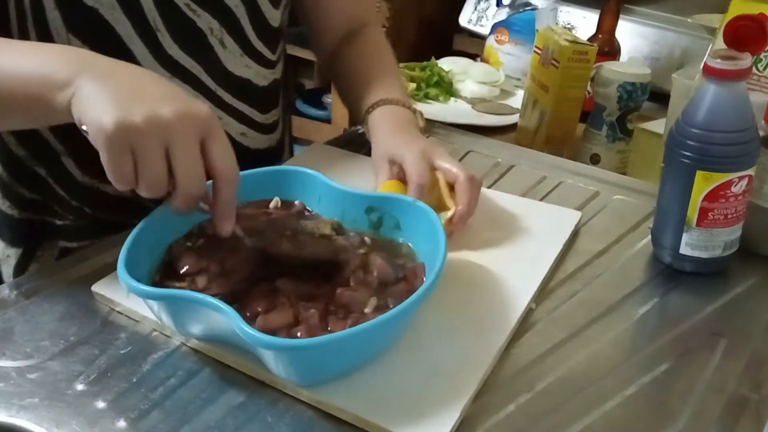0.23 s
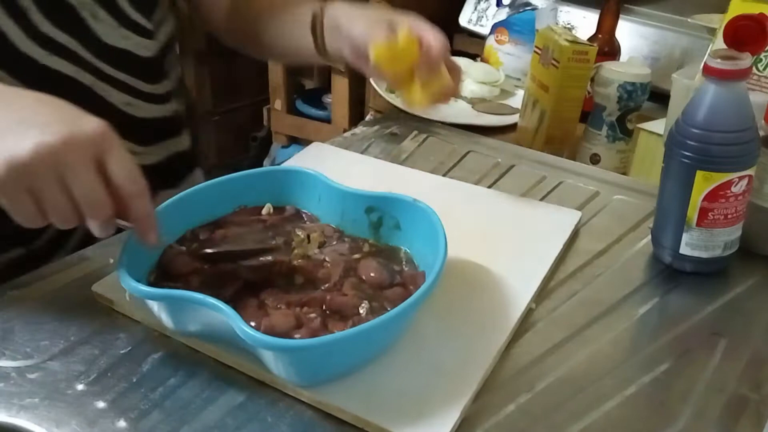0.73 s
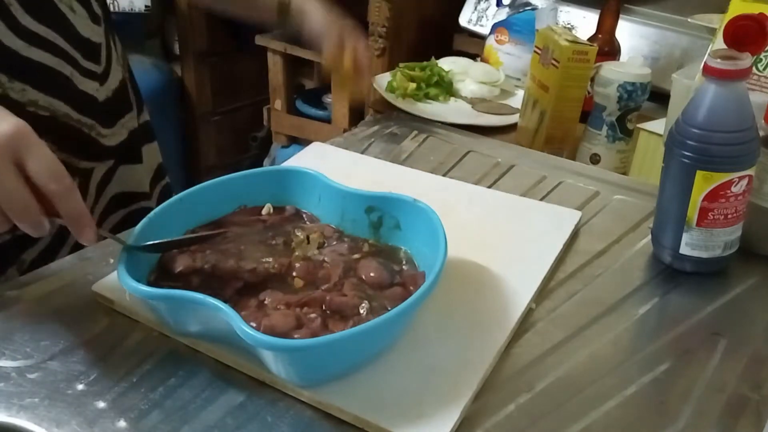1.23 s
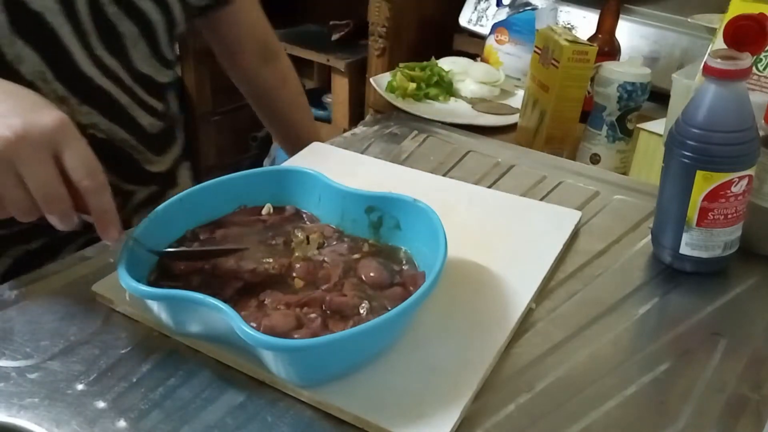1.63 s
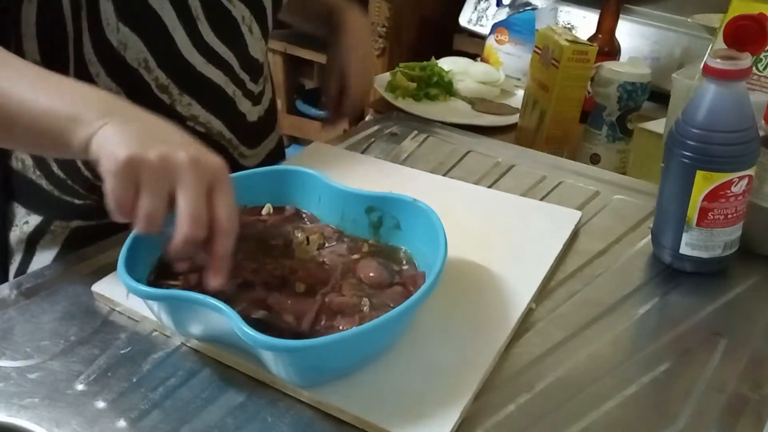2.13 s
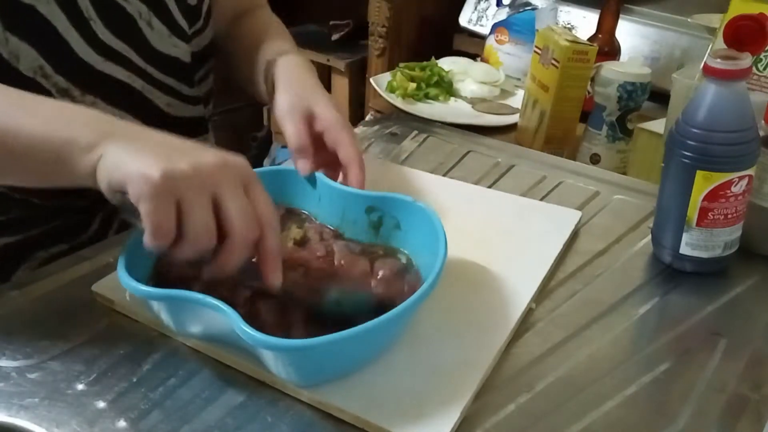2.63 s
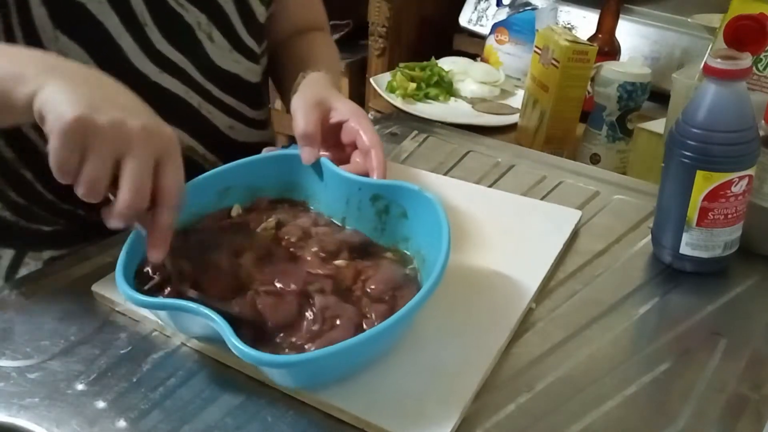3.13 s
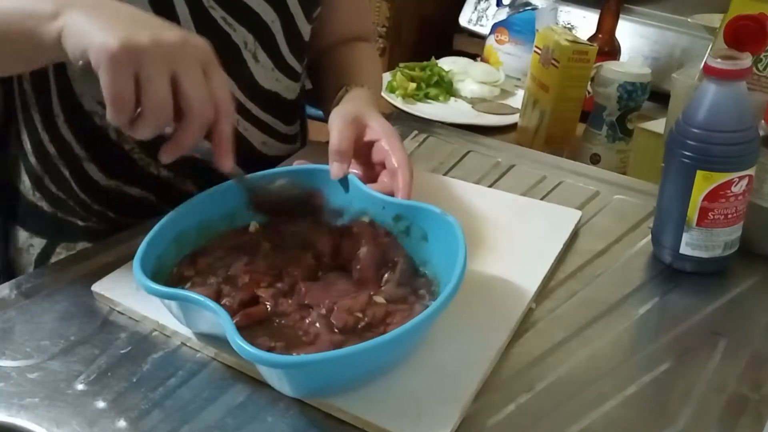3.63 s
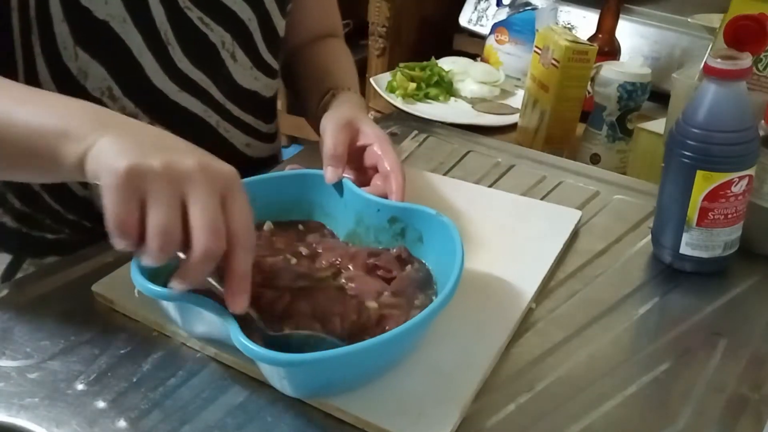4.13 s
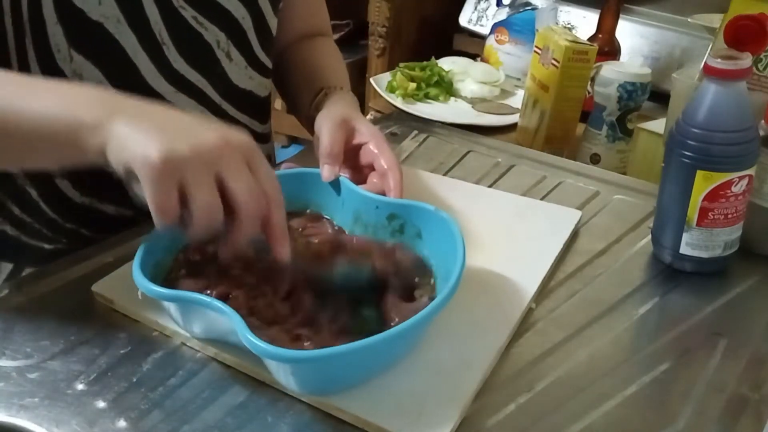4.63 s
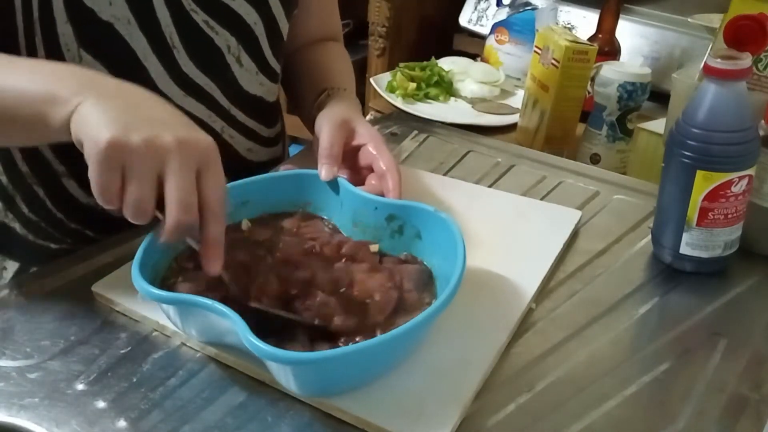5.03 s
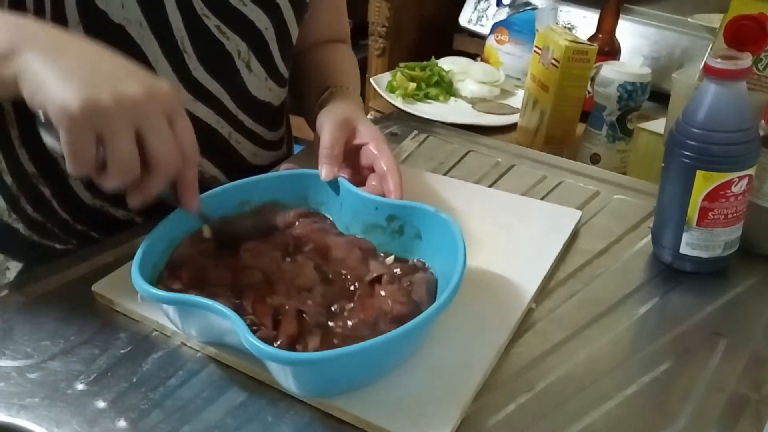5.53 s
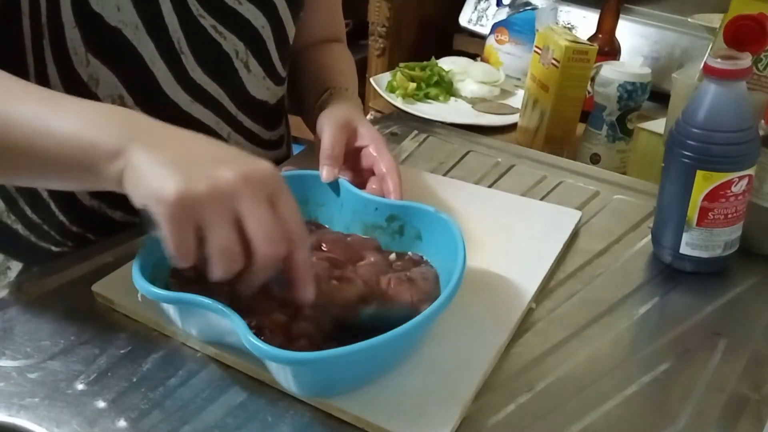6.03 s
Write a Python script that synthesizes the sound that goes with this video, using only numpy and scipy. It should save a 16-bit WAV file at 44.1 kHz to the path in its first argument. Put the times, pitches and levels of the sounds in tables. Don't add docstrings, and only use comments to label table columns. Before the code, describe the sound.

Close, slightly muffled phone pickup in a small kitchen with faint low hum. Low rumble and wet squelching come with sharp plastic knocks; after a lull, a spoon scrapes the bowl wall and rattles. Quiet sucking, sloshing and small ticks continue, broken by firm knocks past the middle and one hard, rattling clatter near the end, then only soft stirring.

```python
import sys
import numpy as np
from scipy import signal
from scipy.fft import rfft, irfft, next_fast_len
from scipy.io import wavfile
from scipy.ndimage import uniform_filter1d

SR = 44100
rng = np.random.default_rng(int(sys.argv[2]) if len(sys.argv) > 2 else 0)


def master(y):
    cut = np.clip(np.atleast_2d(y).T, -1, 1)
    pcm = np.round(cut * 32767)
    wavfile.write(sys.argv[1], SR, pcm.astype(np.int16))


def makeup_ratio(level_db):
    decades = np.asarray(level_db, float) / 20
    return 10 ** decades


N = 277256

# pitch_hz, level_db
AIR_TONE = [(24, -18), (40, -19), (86, -7.5), (150, -6), (263, -20.5), (381, -16), (620, -25),
            (1000, -30.5), (2500, -35), (5500, -41), (7000, -54), (9000, -78.5), (16000, -120)]
RUMBLE_TONE = [(15, -24.5), (25, -21.5), (38, -24.5), (86, -9), (113, 1), (135, -0.5), (151, -22),
               (172, -5.5), (280, -25.5), (360, -60.5), (620, -120)]
SLOSH_TONE = [(150, -41.5), (250, 1), (270, -5.5), (572, -5.5), (617, 2), (704, -15.5), (791, -6.5),
              (1300, -23), (1690, -39), (2860, -120)]
SQUELCH_TONE = [(530, -36), (900, -6.5), (1400, 0.5), (2110, -1), (2950, -7.5), (4000, -20.5), (6000, -45)]
FIZZ_TONE = [(1800, -39), (2800, -2.5), (3500, -1.5), (5900, -5), (7000, -11.5), (7800, -20), (10000, -14),
             (13000, -44)]
SCRAPE_TONE = [(150, -58), (250, -17), (362, -2.5), (547, -7), (780, -1), (1250, 0), (4420, -6),
               (6140, -10), (7490, -17.5), (8300, -20.5), (9700, -17.5), (12000, -32), (13300, -40),
               (14800, -39), (15500, -40.5)]
MIC_TONE = [(30, -5), (70, 3), (6200, -1.5), (7300, -4), (8100, -10.5), (9700, -12), (12000, -12.5),
            (15000, -11.5)]
# pitch_hz, width_hz, level_db
BOOM = [(92.2, 50, -7), (135, 34, -3), (182.1, 18.8, 4.5), (285, 56, -18)]
HOLLOW = [(374, 59, 1), (495.4, 54.6, 4), (571, 47, 0), (662.5, 96, -1.5), (777.6, 37, 1), (857, 28, -2.5)]
RING = [(1180, 315, 0), (1400, 130, 3), (1690, 820, -1.5), (2000, 230, 1), (2270, 680, -6),
        (2628, 120, -3.5), (2830, 340, -7)]
SPLASH = [(3440, 910, 6.5), (4300, 1700, 2), (5630, 1800, 0), (6450, 2700, -6.5), (9600, 3100, -17.5),
          (13000, 3000, -36)]
# peak_s, rise_and_fall_s, rumble_db, slosh_below_rumble_db
SHOVES = [(.06, 0.19, -59, -16), (.31, 0.22, -63, -6.5), (0.471, 0.1, -56, -14), (0.659, .11, -56, -19),
          (0.861, 0.034, -61.5, -24), (0.939, 0.076, -59.5, -4.5), (1.036, 0.043, -60.5, -14),
          (1.155, 0.12, -59, -16.5), (1.331, 0.072, -63, -20), (1.424, 0.1, -62, -27),
          (1.652, 0.098, -56.5, -23), (1.95, 0.24, -56.5, -7), (2.419, .06, -61, -25),
          (2.56, 0.09, -61, -12.5), (2.638, 0.27, -59.5, -11.5), (2.89, 0.045, -60, -9.5),
          (2.98, 0.046, -62.5, -11), (3.13, 0.51, -60.5, -14.5), (3.5, 0.26, -61, -19),
          (3.75, 0.18, -62.5, -12), (3.919, 0.14, -59, -7.5), (4.25, 0.18, -56, -15.5),
          (4.485, 0.13, -54.5, -18.5), (4.86, 0.13, -57, -15.5), (5.1, 0.089, -70.5, -8.5),
          (5.37, 0.11, -59, -9), (5.649, 0.17, -56, -20.5), (5.92, 0.21, -62, -9), (6.093, 0.15, -54, -20),
          (6.269, 0.083, -64.5, -9)]
# peak_s, rise_s, fall_s, squelch_db, fizz_over_squelch_db
STROKES = [(0.071, 0.064, 0.19, -60, -3), (.472, 0.099, 0.064, -72.5, 1.5),
           (.658, 0.047, 0.11, -72.5, -7.5), (.942, 0.12, 0.1, -73.5, -2.5), (1.038, 0.11, 0.043, -75, -9),
           (1.155, 0.41, 0.26, -78, -10), (1.6, 0.05, 0.49, -78.5, -5.5), (1.85, 0.22, .3, -76.5, 6.5),
           (2.42, .3, 0.074, -64, -11), (2.578, 0.22, 0.14, -74, -5), (2.78, 0.4, 0.59, -75.5, -5.5),
           (2.916, 0.014, 0.015, -71.5, -9), (2.97, 0.013, 0.55, -85.5, -17), (3.328, 0.22, 0.33, -89, -1),
           (3.578, 0.13, 0.028, -73, -5.5), (3.63, 0.0078, 0.42, -73, -1.5),
           (3.726, 0.095, 0.027, -82, 11.5), (3.95, 0.24, 0.055, -70.5, -5.5),
           (4.257, 0.043, 0.14, -68.5, -4), (5.239, 0.1, .06, -81.5, -1), (5.361, 0.04, 0.053, -60.5, -8.5),
           (5.6, 0.068, 0.082, -82, -7), (5.69, 0.04, 0.39, -72, -10.5), (6.188, 0.27, 0.24, -77.5, -7.5)]
# start_s, ring_db, boom_over_ring_db, hollow_over_ring_db, fade_60db_s
DRY_KNOCKS = [(0.079, -43, -38, 2.5, 0.5), (0.0858, -27.5, -1.3, -7.5, 0.46),
              (0.1731, -36, -3.5, -1.5, 0.15), (1.1718, -35, -7.5, -7.5, 0.27), (1.215, -47, 5.5, -1, 0.14),
              (2.0882, -33.5, -10.5, -4.5, 0.37), (2.203, -42.5, 6, 3, 0.66),
              (2.2592, -28, -16.5, -12, 0.35), (2.5647, -57, -20, -6, 0.9), (4.2497, -69, -6, -6, 0.2),
              (4.6665, -24.5, -11.5, -12, 0.31), (5.702, -22.5, -6, -7, 0.26),
              (5.707, -18.5, -12, -9.5, 0.35), (5.734, -22, -25, -9, 0.25)]
# start_s, peak_db, pitch_hz, fade_60db_s
RIM_TICKS = [(.152, -36, 1890, 0.0039), (0.319, -52.5, 1900, 0.031), (0.3195, -56, 2930, 0.019),
             (.32, -56, 2380, 0.018), (1.173, -34, 1990, 0.0071), (1.1732, -44, 2690, 0.011),
             (1.1735, -46.5, 3200, 0.01), (2.31, -32, 2300, 0.011), (2.319, -27, 2270, 0.0062),
             (2.443, -57.5, 2300, 0.016), (3.507, -66.5, 2510, 0.0074), (3.522, -69.5, 1750, 0.019),
             (4.576, -45.5, 3180, 0.0095), (4.577, -37, 2270, 0.009), (4.668, -35, 1400, 0.019),
             (5.549, -59.5, 1400, 0.031), (5.703, -29.5, 1224, 0.055), (5.7118, -28, 1020, 0.0034),
             (5.7175, -31, 1240, 0.028), (.086, -32.5, 489.5, 0.059)]
# centre_s, peak_db, pitch_hz
CHATTER = [(.087, -38, 1560), (.105, -39, 1400), (.138, -46, 3140), (.167, -49, 3120), (.175, -41.5, 1905),
           (.177, -41, 732), (1.176, -46, 520), (1.19, -43, 626), (1.893, -53, 1335), (1.95, -45, 1378),
           (1.955, -45, 840), (1.978, -51, 3980), (1.992, -44, 760), (2.009, -49, 4435), (2.023, -44, 2310),
           (2.029, -51, 1356), (2.158, -45, 2410), (2.204, -42, 607), (2.222, -42, 600), (2.242, -41, 330),
           (2.254, -42, 296), (2.277, -42, 1790), (2.286, -42.5, 3100), (2.303, -36, 650),
           (2.306, -46, 1614), (2.321, -41, 1660), (2.341, -45, 563), (2.359, -44, 624), (3.15, -49, 520),
           (3.169, -51, 1610), (3.182, -52, 2800), (3.688, -68, 3280), (4.253, -61, 2060),
           (4.582, -44, 1356), (4.69, -39, 1840), (4.7, -42, 1820), (4.699, -53, 4170), (4.71, -42, 818),
           (5.531, -71, 1700), (5.551, -57, 1765), (5.711, -36, 2282), (5.711, -31, 1210),
           (5.714, -36.5, 2980), (5.72, -27.5, 700), (5.736, -33.5, 2594), (5.736, -30, 602),
           (5.738, -49, 5577), (5.751, -30, 847), (5.751, -42, 2600), (5.762, -32, 654), (5.77, -32, 1141),
           (5.785, -38, 660), (5.802, -38, 624), (5.816, -42, 689)]
# centre_s, peak_db, pitch_hz
GRIT = [(.0875, -44, 2300), (.153, -46.5, 3300), (.176, -42, 2600), (.3205, -51, 2900), (.3205, -48, 2300),
        (1.174, -46, 3700), (1.437, -57, 680), (1.948, -44, 2500), (1.962, -44, 1800), (1.985, -46, 3000),
        (2.018, -46, 2800), (2.033, -42, 2000), (2.108, -46, 1500), (2.216, -38, 700), (2.288, -44, 3600),
        (2.305, -46, 4000), (2.511, -62, 2400), (2.446, -60, 1400), (2.488, -72, 2500), (2.753, -60, 1500),
        (3.147, -45.5, 2000), (4.293, -59.5, 2400), (4.685, -36, 1100), (4.701, -36.5, 1500),
        (5.371, -53, 650), (5.55, -63, 3000), (5.55, -64, 4000), (5.7129, -22, 1100), (5.7035, -27, 1300),
        (3.168, -43, 1700), (5.751, -32, 1500), (5.7265, -25.5, 1000)]
# centre_s, peak_db, pitch_hz
HUMS = [(.11, -38.5, 366), (.1, -41, 500), (.18, -45.5, 824), (1.195, -50.5, 600), (1.23, -52, 500),
        (1.458, -60, 600), (2.105, -49.5, 370), (2.235, -43.5, 285), (2.29, -47, 590), (3.165, -51.5, 300),
        (3.16, -55, 540), (3.245, -60, 620), (4.605, -48.5, 480), (4.71, -49, 850), (5.385, -56, 600),
        (5.73, -31.5, 587), (5.735, -37, 754), (5.77, -39, 662), (5.73, -35, 1394), (5.745, -38, 1126),
        (5.74, -42.5, 2005), (5.74, -41.5, 2589), (5.75, -40, 388), (.95, -68, 560), (3.55, -82, 850),
        (6.175, -76, 1400)]
# start_s, peak_db, pitch_hz
SNAPS = [
    (0.117, -54.5, 6160),
    (2.5097, -71, 6750),
    (2.753, -58.5, 5900),
    (3.148, -46.5, 5970),
    (3.63, -62, 6700),
    (3.6486, -64, 5130),
    (3.726, -65, 4540),
    (4.165, -76, 6600),
    (4.578, -50.5, 5660),
    (5.5503, -60.5, 5400),
]
# start_s, ring_db, boom_over_ring_db, hollow_over_ring_db, fade_60db_s
WET_KNOCKS = [(0.1444, -32.5, -6.5, -12.5, 0.25), (1.4341, -56.5, -8, 5.5, 0.18),
              (2.2844, -29.5, -28, -6, 0.2), (2.3192, -30.5, -14, -13, 0.17), (2.7512, -51, 2.5, -6, 0.23),
              (3.146, -41, -12.5, -6, 0.36), (3.1659, -36, -5.5, -21.5, 0.22), (4.2035, -72.5, 29, 0, 0.23),
              (4.5773, -35, 1, -4.5, 0.24), (4.6987, -44.5, -6, -14, 0.35), (5.3687, -50, -21, 5, 0.2),
              (5.551, -56.5, -13, -20.5, 0.11), (5.697, -28, -12, -9.5, 0.15)]
# start_s, end_s, pitch_hz, width_hz, level_db
RUBS = [(0.32, 0.48, 2000, 200, -82), (0.41, 0.505, 2960, 1300, -68), (0.415, 0.46, 5930, 2000, -77.5),
        (0.635, .72, 2830, 150, -83), (1.555, 1.633, 1450, 200, -85), (2.3, 2.417, 5600, 250, -68.5),
        (2.56, 2.66, 1240, 497, -67), (2.566, 2.74, 1850, 380, -74), (2.58, 2.8, 3750, 130, -84),
        (3.55, 3.61, 1310, 220, -77), (3.852, 4.062, 1970, 200, -83), (4.283, 4.352, 1510, 200, -75.5),
        (4.574, 4.61, 10520, 150, -74), (5.565, 5.69, 1700, 900, -81), (5.705, 5.76, 4610, 150, -53.5),
        (5.56, 5.59, 6750, 300, -83), (5.63, 5.66, 5700, 500, -86), (3.33, 3.37, 4360, 500, -86),
        (4.165, 4.23, 2980, 400, -87), (5.38, 5.41, 1780, 200, -70), (.76, .8, 1900, 170, -84),
        (5.688, 5.7, 2300, 1500, -64), (4.655, 4.67, 1800, 1500, -62), (5.53, 5.6, 1700, 500, -74),
        (5.57, 5.62, 2850, 200, -82), (1.174, 1.2, 3300, 1500, -63), (.63, .725, 1900, 400, -82),
        (1.05, 1.165, 1400, 400, -80), (6.155, 6.2, 1900, 400, -79), (3.83, 3.98, 1300, 500, -77)]
# centre_s, peak_db, pitch_hz
ROCKS = [(.86, -59, 111), (.9, -55.5, 111), (1.038, -61, 128), (1.34, -58, 125), (1.37, -59, 120),
         (1.668, -55.5, 109), (2.147, -46, 110.1), (2.387, -51, 108.3), (2.815, -59.5, 110),
         (3.245, -53, 124), (3.443, -56.5, 124), (3.571, -57, 110), (3.78, -56.5, 110), (3.829, -56, 111),
         (4.02, -59, 125), (4.227, -50.5, 149.6), (4.725, -41, 109.6), (4.831, -48, 126),
         (5.315, -54.5, 109), (5.357, -57, 109), (5.45, -64, 128), (6.031, -58, 106), (6.082, -52.5, 110),
         (6.269, -59, 127)]
# start_s, level_db, pitch_hz
THUMPS = [
    (1.178, -33.5, 146.6),
    (1.9, -49.5, 101),
    (2.084, -40, 135),
    (3.158, -36.5, 183.6),
    (4.581, -34.5, 141.3),
    (5.715, -34.5, 182.1),
]
# time_s, level_db
SCRAPE = [
    (1.875, -54),
    (1.881, -51.5),
    (1.929, -48.5),
    (2.031, -44.5),
    (2.041, -48),
    (2.135, -47),
    (2.25, -59),
]
# start_s, peak_db, pitch_hz, fade_60db_s
DEEP_TICKS = [(2.214, -38.5, 644, 0.035), (2.262, -38.5, 1400, 0.011), (2.268, -35, 780, 0.024),
              (2.488, -65, 3170, 0.021), (2.511, -64.5, 2430, 0.018), (2.566, -58.5, 1184, 0.022),
              (3.146, -32.5, 2880, 0.0053), (3.166, -47.5, 2086, 0.024), (4.292, -59.5, 2460, 0.023),
              (4.6684, -43, 2730, 0.008), (4.683, -36, 860, 0.016), (4.698, -39, 840, 0.019),
              (5.203, -67, 1940, 0.029), (5.313, -63, 950, 0.0082), (5.337, -52, 1747, 0.044),
              (5.5485, -61.5, 3270, 0.0034), (5.549, -63, 1890, 0.0088), (5.7114, -21.5, 700, 0.013)]
# start_s, peak_db, pitch_hz
GLINTS = [(2.2697, -58.5, 9900), (2.4877, -73, 9440), (2.5097, -73, 9590), (2.5187, -67, 9530),
          (2.7511, -71, 8860), (3.1457, -51, 9100), (3.185, -56, 9200), (3.552, -58, 9600),
          (4.576, -58, 9900), (4.6972, -60, 10400), (5.5488, -58, 8970), (3.631, -66, 10000)]


def evened(x):
    return x / np.sqrt(np.mean(x ** 2) + 1e-20)


def read(points, hz):
    f, value = np.transpose(points)
    return np.interp(np.log(hz + 1), np.log(f + 1), value)


def add(mix, s, sound):
    part = mix[round(s * SR):][:len(sound)]
    part += sound[:len(part)]


def colour(x, tone):
    size = next_fast_len(len(x))
    gain = makeup_ratio(read(tone, np.fft.rfftfreq(size, 1 / SR)))
    return irfft(rfft(x, size) * gain, size)[:len(x)]


def resonate(x, modes):
    hz = np.fft.rfftfreq(len(x), 1 / SR)
    gain = 0
    for k, (f, width, db) in enumerate(modes):
        gain = gain + (-1) ** k * makeup_ratio(db) / (1 + 2j * (hz - f) / width) ** 2
    return evened(irfft(rfft(x) * gain, len(x)))


def lumpy(per_s, lumps_db):
    steps = rng.standard_normal(400)
    wander = np.interp(np.arange(N) / SR * per_s, np.arange(400), steps)
    return rng.standard_normal(N) * makeup_ratio(lumps_db * wander)


def swells(peaks_s, rises_s, falls_s, peaks_db):
    t = np.arange(0, N + 64, 64) / SR
    off = t[:, None] - peaks_s
    away = np.where(off < 0, -off / np.maximum(rises_s, .005), off / np.maximum(falls_s, .005))
    levels_db = peaks_db - 20 * away
    gain = np.sqrt((makeup_ratio(levels_db) ** 2).sum(1))
    return np.interp(np.arange(N) / SR, t, gain)


def dying(t, t60, rise, bend):
    return (1 - np.exp(-t / rise)) * makeup_ratio(-60 * t / t60 - 60 * (t / bend) ** 2)


def streaky(x, patchy_db):
    hz, t, z = signal.stft(x, SR, nperseg=1024, noverlap=768)
    patches = uniform_filter1d(rng.standard_normal(z.shape), size=4, axis=0)
    patches = evened(uniform_filter1d(patches, size=11, axis=1))
    return signal.istft(z * makeup_ratio(patchy_db * patches - 1.5), SR, nperseg=1024, noverlap=768)[1][:N]


def air():
    return makeup_ratio(-72.5) * evened(colour(lumpy(30, 1.4), AIR_TONE))


def rumble():
    s, span, db, slosh_db = np.transpose(SHOVES)
    return swells(s, span, span, db) * evened(colour(lumpy(22, 3.5), RUMBLE_TONE))


def slosh():
    s, span, db, slosh_db = np.transpose(SHOVES)
    return swells(s, 1.6 * span, 1.06 * span, db + slosh_db) * evened(colour(lumpy(25, 3.2), SLOSH_TONE))


def bubbling(per_s, spread_db, t60, tone):
    sizes = makeup_ratio(spread_db * np.minimum(rng.exponential(1, N), 5))
    pops = sizes * (rng.random(N) < per_s / SR)
    keep = makeup_ratio(-60 / (t60 * SR)) ** 2
    power = signal.lfilter([1 - keep], [1, -keep], pops ** 2)
    return evened(colour(rng.standard_normal(N) * np.sqrt(power + 1e-12), tone))


def squelch():
    s, rise, fall, db, fizz_db = np.transpose(STROKES)
    suck = swells(s, rise, fall, db) * bubbling(600, 2.9, 0.3, SQUELCH_TONE)
    fizz = swells(s, rise, fall, db + fizz_db) * bubbling(1500, 3.4, .1, FIZZ_TONE)
    return suck + fizz


def rippled(x, width_hz, ripple_db):
    hz = np.fft.rfftfreq(len(x), 1 / SR)
    ripple = np.interp(hz / width_hz, np.arange(1000), rng.standard_normal(1000))
    return irfft(rfft(x) * makeup_ratio(ripple_db * ripple), len(x))


def knock(s, ring_db, boom_db, hollow_db, splash_db, t60):
    t = np.arange(16384) / SR
    taps = rng.standard_normal((4, len(t))) * makeup_ratio(4.77 * np.minimum(rng.exponential(1, (4, len(t))), 5))
    taps = [rippled(row, 70, 3.2) for row in taps]
    modes = 0
    for hz, width, db in BOOM:
        turns = hz * rng.uniform(.94, 1.06) * t + rng.random()
        modes = modes + makeup_ratio(db + 1.8 * rng.standard_normal()) * np.sin(2 * np.pi * turns)
    boom = 0.48 * evened(modes) + 0.8 * resonate(np.diff(taps[0], prepend=0), BOOM)
    boom *= makeup_ratio(boom_db - 1.5) * dying(np.maximum(t - .006, 0), 1.81 * t60, 0.017, 0.21)
    hollow = makeup_ratio(hollow_db - 5.0) * resonate(taps[1], HOLLOW) * dying(t, 1.29 * t60, 0.00054, .45)
    ring = makeup_ratio(-11.5) * resonate(taps[2], RING) * dying(t, 1.07 * t60, 0.00088, .45)
    splash = makeup_ratio(splash_db - 0.5) * resonate(taps[3], SPLASH) * dying(t, 1.22 * t60, 0.0048, 0.37)
    contacts = np.interp(t * 260, np.arange(200), rng.standard_normal(200))
    rattle = makeup_ratio(1.7 * contacts - 1.3)
    return s, makeup_ratio(ring_db) * (boom + rattle * (hollow + ring + splash))


def dry_knock(s, ring_db, boom_db, hollow_db, t60):
    return knock(s, ring_db, boom_db, hollow_db, -26.5, t60)


def tick(s, peak_db, hz, t60, room_db):
    t = np.arange(8192) / SR
    ring = np.sin(2 * np.pi * hz * t) * dying(t, max(t60, .002), 0.066 * t60, .7)
    room = resonate(rng.standard_normal(len(t)), [(hz, 6.5 / max(t60, .002), 0)])
    room = makeup_ratio(room_db) * room * dying(t, 0.21, 0.008, 0.85)
    return s + .0003, makeup_ratio(peak_db) * (1.224 * ring / abs(ring).max() + room)


def rim_tick(s, peak_db, hz, t60):
    return tick(s, peak_db, hz, t60, room_db=-17)


def blip(s, peak_db, hz, length, loose):
    u = np.arange(0, length, 1 / SR) / length
    turns = hz * length * (1.033 * u - .04 * u ** 2)
    turns += loose * rng.random() - turns[len(u) * 2 // 5] - 1 / 4
    swell = np.sin(np.pi * u ** 0.78) ** 2
    return s - 0.402 * length, makeup_ratio(peak_db) * swell * np.sin(2 * np.pi * turns)


def chatter(s, peak_db, hz):
    return blip(s, peak_db, hz, length=0.00899, loose=True)


def grit(s, peak_db, hz):
    return blip(s, peak_db, hz, length=.003, loose=False)


def hum(s, peak_db, hz):
    return blip(s, peak_db, hz, length=.07, loose=True)


def snap(s, peak_db, hz):
    return tick(s, peak_db, hz, t60=0.0042, room_db=-10)


def wet_knock(s, ring_db, boom_db, hollow_db, t60):
    return knock(s, ring_db, boom_db, hollow_db, -17.5, t60)


def rub(start, end, hz, width_hz, db):
    whistle = resonate(rng.standard_normal(16384), [(hz, width_hz, 0)])[:round((end - start) * SR)]
    fade = signal.windows.tukey(len(whistle), .3) * np.linspace(1.3, .5, len(whistle))
    return start, makeup_ratio(db) * whistle * fade


def rock(s, peak_db, hz):
    return blip(s, peak_db, hz, length=0.0486, loose=True)


def thump(s, db, hz):
    t = np.arange(8192) / SR
    wobble = 1 + 0.65 * np.sin(2 * np.pi * (35 * t + rng.random()))
    return s, makeup_ratio(db) * wobble * np.sin(2 * np.pi * hz * t) * dying(t, 0.57, 0.024, 0.23)


def scrape():
    t = np.arange(N) / SR
    touching = np.interp(t, [1.8, 1.864, 1.872, 2.24, 2.29], [0.11, 0.51, 1, 0.95, 0.12])
    time_s, level_db = np.transpose(SCRAPE)
    level = makeup_ratio(np.interp(t, time_s, level_db) + 2.0)
    return touching ** 3 * level * evened(colour(lumpy(60, 1.2), SCRAPE_TONE))


def deep_tick(s, peak_db, hz, t60):
    return tick(s, peak_db, hz, t60, room_db=-10.5)


def glint(s, peak_db, hz):
    return tick(s, peak_db, hz, t60=.004, room_db=-22)


def scene():
    mix = streaky(air() + squelch() + slosh(), 2.4) + rumble() + scrape()
    events = [(dry_knock, DRY_KNOCKS), (rim_tick, RIM_TICKS), (chatter, CHATTER), (grit, GRIT),
              (hum, HUMS), (snap, SNAPS), (wet_knock, WET_KNOCKS), (rub, RUBS), (rock, ROCKS),
              (thump, THUMPS), (deep_tick, DEEP_TICKS), (glint, GLINTS)]
    for source, table in events:
        for row in table:
            add(mix, *source(*row))
    return mix[None]


def roll_off(x):
    return signal.sosfilt(signal.butter(12, 15460, fs=SR, output="sos"), x)


def record(dry):
    hiss = makeup_ratio(-98) * rng.standard_normal(N)
    heard = colour(dry[0], MIC_TONE) + hiss
    return roll_off(heard[None])


dry = scene()
out = record(dry)
master(out)
```